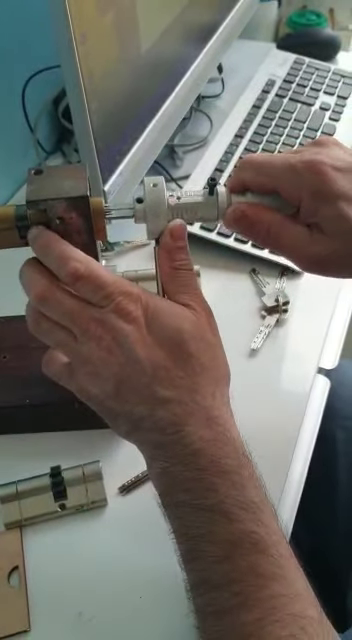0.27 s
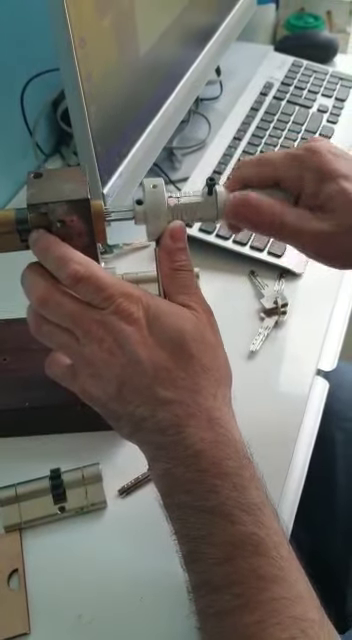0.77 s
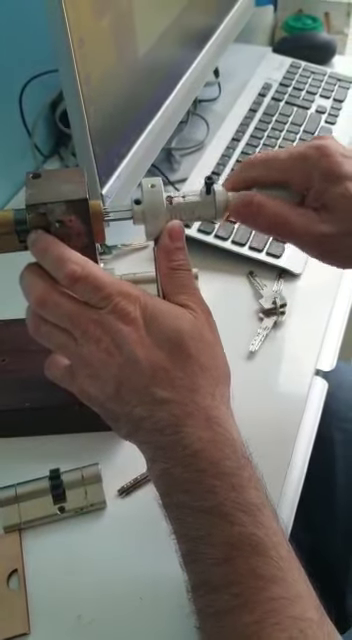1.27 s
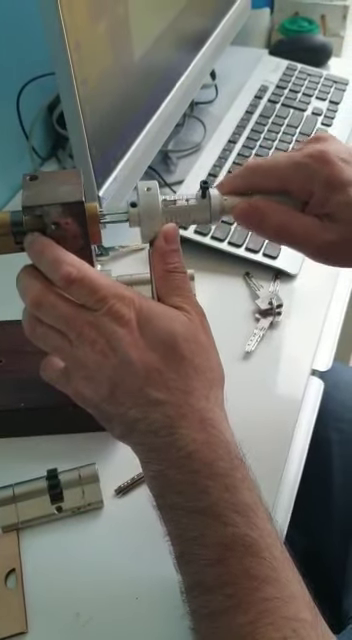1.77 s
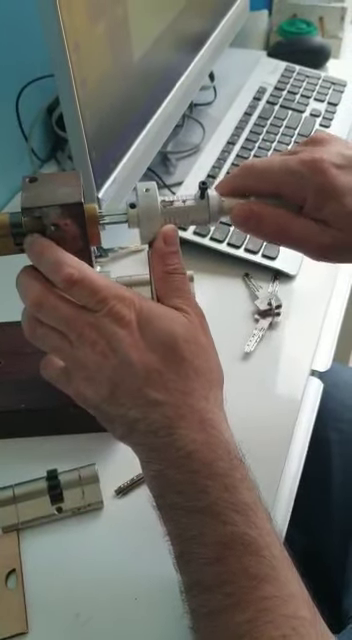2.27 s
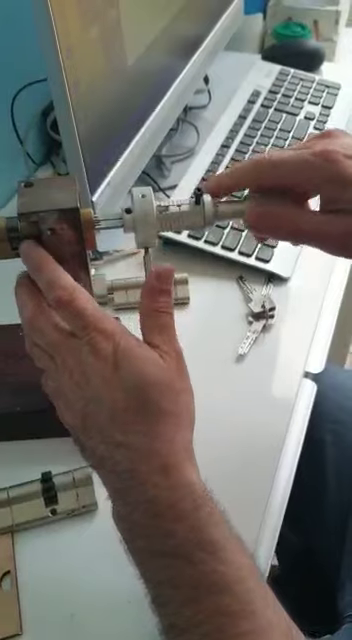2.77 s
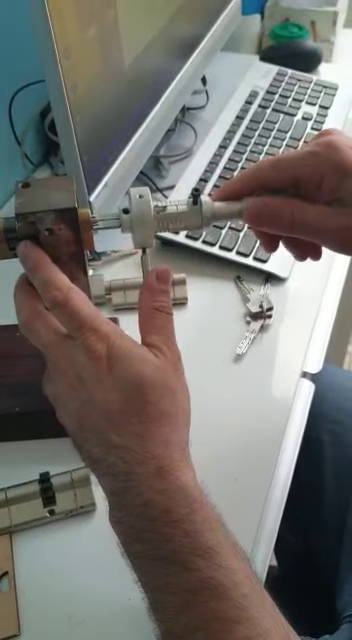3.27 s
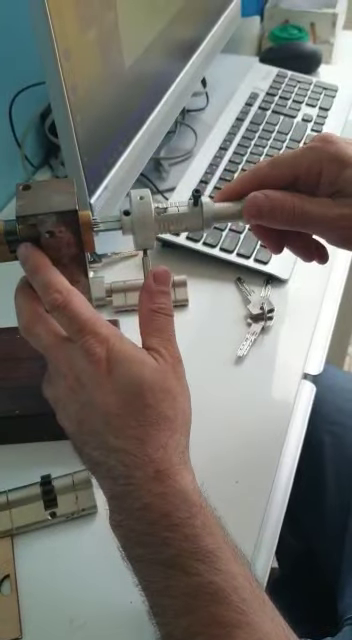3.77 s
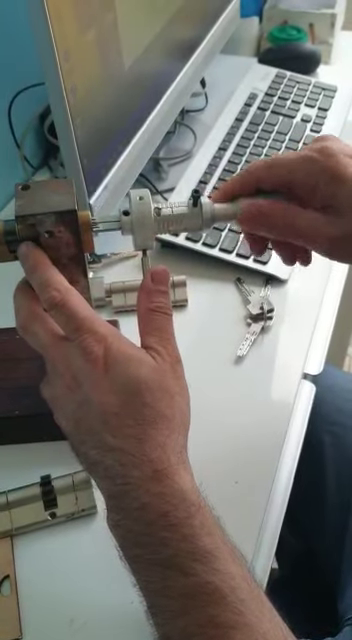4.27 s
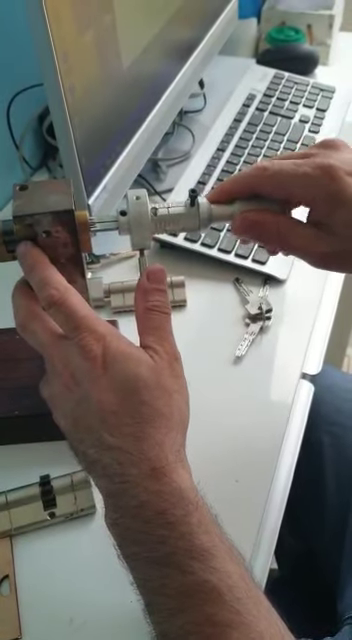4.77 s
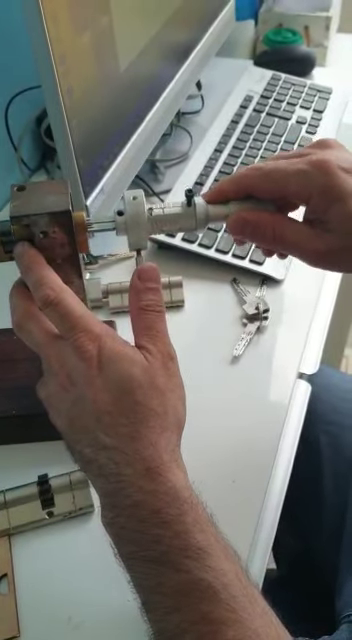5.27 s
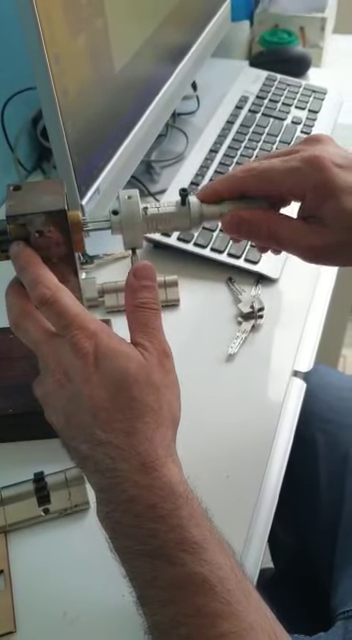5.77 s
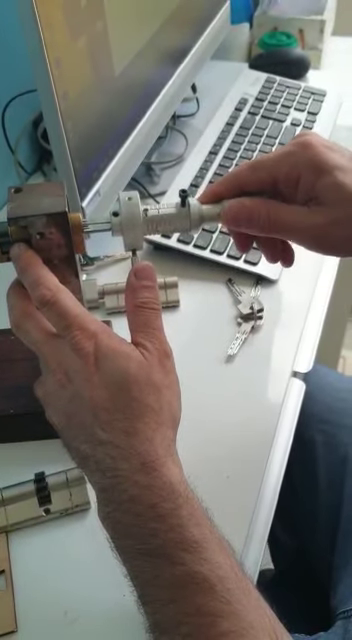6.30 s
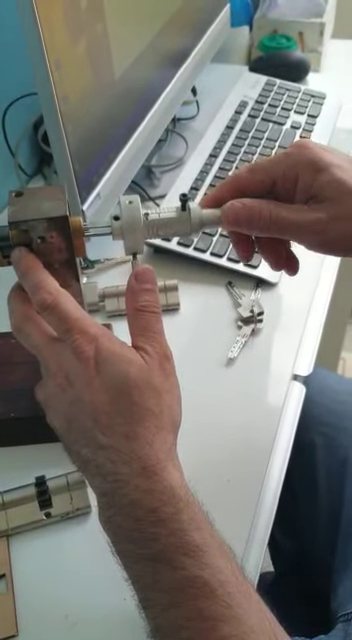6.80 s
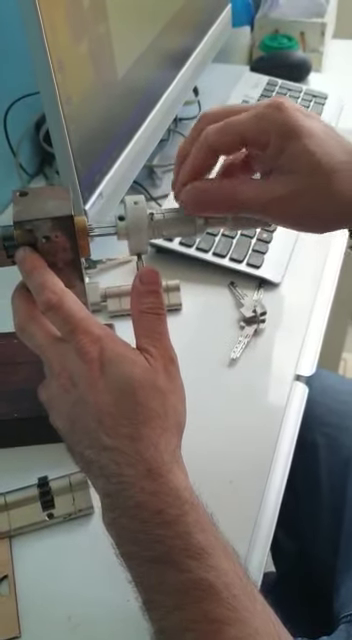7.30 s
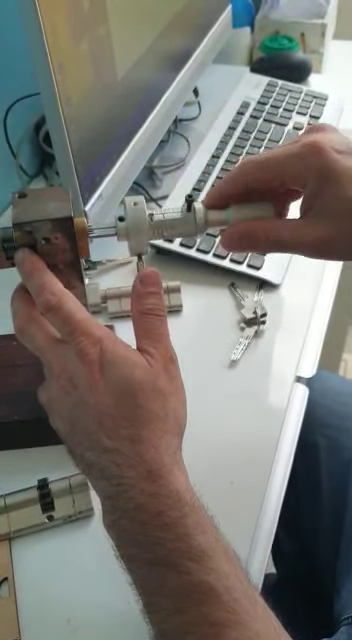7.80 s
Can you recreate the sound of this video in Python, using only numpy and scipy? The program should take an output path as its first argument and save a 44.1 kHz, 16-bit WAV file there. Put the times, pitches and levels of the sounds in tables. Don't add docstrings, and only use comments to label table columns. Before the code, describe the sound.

In a small room, a steel pick tool works in a lock cylinder close to a stereo microphone. Sparse dry ticks come first, then a snap and a high clean chirp, later a cluster of rough thread squeals, ticks and soft chirps, and a final small rattle. Underneath, a fan hums steadily with soft air, and far traffic rumbles with engines pulling away outside.

```python
import sys
import numpy as np
from scipy import signal
from scipy.fft import rfft, irfft, next_fast_len
from scipy.io import wavfile

SR = 44100
rng = np.random.default_rng(int(sys.argv[2]) if len(sys.argv) > 2 else 0)


def makeup_ratio(level_db):
    decades = np.asarray(level_db, float) / 20
    return 10 ** decades


def to_wav(s):
    ch = np.atleast_2d(s).T
    pcm = np.round(np.clip(ch, -1, 1) * 32767)
    wavfile.write(sys.argv[1], SR, pcm.astype(np.int16))


N = 354696

# pitch in Hz, level in dB.
FAN_TONES = [(64, -51), (100, -56.5), (124, -55), (153, -54), (241, -67), (304, -69.5), (366, -76),
             (376, -74), (425, -68), (485, -72.5), (545, -75), (596, -76.5)]
# time in seconds, level in dB.
DRONE_LEVEL = [(0, -53), (0.69, -59), (1.14, -49), (1.749, -47), (2.57, -62), (3.522, -46), (4.199, -45),
               (4.949, -65), (5.549, -49), (5.9, -55.5), (6.96, -45), (7.2, -51.5), (8.04, -47)]
DRONE_HZ = 182.2
# frequency in Hz, level in dB per Hz.
AIR_COLOUR = [(110, -23.5), (190, -5), (209, -14), (240, -9.5), (306, -11.5), (330, -14.5), (367, -6.5),
              (399, -13.5), (426, -12.5), (700, -18), (1100, -41.5), (2000, -74.5)]
AIR_DB, AIR_RISE_DB, AIR_RISE_S = -60, 11, 15

# time in seconds, level in dB.
TRAFFIC_LEVEL = [
    (0, -42.5),
    (1.14, -40.5),
    (2.6, -43),
    (3.4, -40),
    (4.8, -42),
    (5.4, -37.5),
    (6.7, -41.5),
    (7.4, -35),
    (8.04, -42.5),
]
# frequency in Hz, level in dB per Hz.
RUMBLE_COLOUR = [(13, -45.5), (22, -16), (32, -19.5), (50, -7.5), (70, -3.5), (134, -0.5), (155, 0),
                 (189, -14.5), (211, -29), (260, -21.5), (340, -56.5), (570, -120)]
# time in seconds, level in dB.
ROAD_LEVEL = [
    (0, -67.5),
    (1.0, -64.5),
    (2.6, -63),
    (4.8, -62),
    (5.3, -64.5),
    (6.6, -64),
    (7.2, -61.5),
    (8.04, -63.5),
]
# frequency in Hz, level in dB per Hz.
ROAD_COLOUR = [(500, -16), (740, -7), (900, 1.5), (1040, -4), (1200, -0.5), (1720, -9.5), (2050, -19),
               (3120, -25.5), (5280, -100)]
# frequency in Hz, likeness from 0 to 1.
LIKENESS = [(30, .85), (60, .88), (150, .95), (280, .68), (500, .3), (950, .05), (15000, 0)]
# frequency in Hz, left minus right in dB.
TILT = [(60, -19), (110, 3), (200, 1.5), (380, 0), (700, 4.5), (1290, -1.5), (2380, -2), (4400, 8.5),
        (8120, 12.5), (15000, 1)]

# start in seconds, peak, knock, body and crack levels in dB.
SPRING_TICKS = [
    (0.17, -63.5, -5, -18, -33),
    (0.1825, -60, -6, -24, -35),
    (0.2244, -44, -8.5, -22, -31),
    (0.232, -58, -25, 3, -12),
    (4.3808, -41.5, -26, -18, -17.5),
    (4.391, -74, -6, -3, -24),
    (4.402, -42, -26, -6.5, -38),
]
# start in seconds, peak, knock, body and crack levels in dB.
PIN_TICKS = [
    (0.549, -72, 7, -16, -20),
    (0.711, -80, 10, 0, -15),
    (1.0023, -74.5, -25, -27, -7),
    (6.1195, -70, -2, -18, -25),
    (6.4602, -48.5, -9.5, -16, -17),
    (6.471, -51, -4, -2.5, -16),
]
# start in seconds, peak and crack levels in dB.
LIGHT_TICKS = [
    (1.3765, -89, 25),
    (1.675, -74, -8),
    (1.727, -76, 14),
    (3.895, -72, -30),
    (7.2495, -86, 8),
]
# start in seconds, peak, knock, body and crack levels in dB.
SNAP_TICKS = [
    (1.447, -42, -13.5, -11, -10.5),
    (2.595, -50, -6.5, -32, -8),
    (2.606, -46, -9, -16, -10),
    (3.4025, -68, -32, -20, 3),
]
# start in seconds, peak, knock, body and crack levels in dB.
COLLAR_TICKS = [
    (2.866, -47.5, -4, -15, -28),
    (3.9612, -66, -9, -28.5, -2.5),
    (4.0484, -45.5, -20.5, -13, -23.5),
    (6.9829, -58, -4, -15, -29),
    (6.9924, -60, 0, -3, -22),
    (7.005, -46, -13, -35, -40),
    (7.012, -58.5, -15, -6, -17),
    (7.028, -71, 15, -29, 2),
]
# pitch in Hz, level in dB, seconds to fall 60 dB.
DESK_MODES = [(720, -12, .02), (960, -7, .025), (1170, 0, .05)]
# pitch in Hz, level in dB, seconds to fall 60 dB.
BODY_MODES = [(2500, 0, .022), (2850, -9, .01), (3700, -10, .01)]
PIN_HZ, COLLAR_HZ, SPRING_HZ, SNAP_HZ = 5990, 8150, 5300, 7100
PIN_DB, COLLAR_DB, SPRING_DB, SNAP_DB = -18, -17, -25.5, -32.5
PART_T60_S, RATTLE_S = .012, .024
CLICK_BAND_HZ = [4300, 8550]

# start and length in seconds, slip rate in Hz,
# level in dB, partials above the second in dB.
BREAKAWAY = [
    (1.4455, .022, 2060, -43, 4),
]
# start and length in seconds, slip rate in Hz,
# level in dB, partials above the second in dB.
CLEAN_SQUEALS = [
    (1.703, 0.051, 3928, -34, 1.5),
    (6.032, 0.029, 3890, -51, -17),
    (6.084, 0.018, 3860, -65, -20),
    (6.1155, 0.037, 3770, -43, -9),
    (6.263, 0.016, 3920, -63, -13),
    (6.343, 0.025, 3780, -59, -15),
]
# start and length in seconds, slip rate in Hz,
# level in dB, partials above the second in dB.
HARSH_SQUEALS = [
    (4.036, 0.034, 2736, -56.5, 16.7),
]
# start and length in seconds, slip rate in Hz,
# level in dB, partials above the second in dB.
ROUGH_SQUEALS = [
    (4.357, 0.037, 2540, -54, 4),
]
# share of the length to grip, share to let go, start below pitch in %,
# settling in seconds, jitter at the start in %, settled jitter in %, grit in dB.
BREAKAWAY_SLIP = (.25, .55, 24, .003, 2.5, 1.0, -8)
CLEAN_SLIP = (.22, .45, 1.3, .018, .3, .25, -38)
HARSH_SLIP = (.15, .5, 0, .006, 4, 2.2, -10)
ROUGH_SLIP = (.45, .35, 2.5, .008, 2.5, 1.6, -21)
# frequency in Hz, level in dB.
CLEAN_COLOUR = [(3800, 0.5), (7600, -0.5), (7830, -1), (11500, -11), (15500, -9.5)]
ROUGH_COLOUR = [(2000, -8.5), (3000, -2), (5600, 3), (8200, 1.5), (8900, -19.5), (9800, -5), (11200, -9.5),
                (15000, -18)]
# time in seconds, slip rate in Hz, level in dB.
TURNS = [
    [(3.111, 2900, -66), (3.117, 2705, -57.5), (3.124, 2740, -54), (3.132, 3140, -54), (3.138, 2880, -59),
     (3.144, 3034, -51.5), (3.16, 2950, -56.5), (3.178, 2900, -62)],
    [(3.238, 2984, -73), (3.244, 3107, -58.5), (3.256, 3280, -58), (3.266, 3286, -55), (3.276, 3030, -52.5),
     (3.28, 3080, -55), (3.285, 3040, -55)],
    [(3.371, 2785, -76), (3.381, 2660, -62), (3.395, 2633, -57), (3.409, 2880, -61), (3.414, 2893, -71)],
    [(4.265, 2630, -62), (4.275, 3015, -54.5), (4.285, 3132, -62), (4.291, 3130, -50), (4.301, 3072, -49.5),
     (4.339, 2976, -52.5), (4.358, 2958, -58)],
]
# second partial in dB, higher partials in dB, jitter in %, grit in dB.
TURN_TONE = [
    (-1, 6.5, 2.7, -13),
    (-5, -8, 2, -28),
    (3, 2.5, 0.56, -29),
    (2.5, 5, 2, -9),
]
# pitch in Hz, level in dB, seconds to fall 60 dB.
SHANK_MODES = [(8230, -9, 0.045), (12400, -16.5, 0.016), (15000, -10.5, 0.032)]
GRIP_DB, LET_GO_DB = -18.5, -32.5
TURN_GRIP_S, TURN_LET_GO_S, TURN_DB = 0.0021, 0.0039, 7
JITTER_HZ, FLUTTER_HZ, FLUTTER_DB = 280, 60, 2.0
SLIP_SIZE = 4500

# time in seconds, firing rate in Hz, load in dB.
GEARS = [
    [(2.5, 34.04, -56), (2.95, 35.2, -47.5), (3.07, 39.44, -43), (3.55, 39.2, -44.5), (3.72, 44.5, -38.5),
     (3.82, 44.53, -47)],
    [(3.8, 44.8, -39.5), (4.25, 48.6, -49.5), (4.55, 54.8, -46), (4.75, 58.85, -40.5), (5.1, 63.5, -39.5),
     (5.5, 71.7, -43.5), (5.9, 75.4, -51)],
    [(3.75, 45.7, -53.5), (4.9, 49.64, -56), (5.9, 54.62, -55.5), (6.4, 60.03, -46.5), (6.55, 61.9, -38),
     (7.0, 62.54, -42.5), (7.25, 61.74, -45), (7.63, 61.33, -43.5), (8.04, 59.9, -45.5)],
]
# 1st, 2nd and 3rd order in dB.
ORDERS_DB = [
    (-5, -4, 2),
    (-0.5, -15.5, -32),
    (-5, 0.5, -19.5),
]

# time in seconds, level in dB.
SLIDE_LEVEL = [
    (3.52, -77),
    (3.558, -56.5),
    (3.602, -58.5),
    (3.7, -72),
    (3.77, -87),
    (3.86, -96),
]
# frequency in Hz, level in dB per Hz.
SLIDE_COLOUR = [(880, -32), (1500, -2.5), (2970, -12.5), (3470, -17.5), (3970, -11), (6810, -15.5),
                (8330, -26), (9720, -19.5), (15000, -32)]

# frequency in Hz, seconds to fall 60 dB.
ROOM_T60 = [(500, .3), (3000, .29), (4000, .3), (5500, .22), (9000, .23), (15000, .2)]
# frequency in Hz, level in dB.
ROOM_COLOUR = [(600, -12), (1300, -5), (2300, 1), (4000, -4), (8000, -1), (15000, -0.5)]
# frequency in Hz, right below left in dB.
SHADOW = [(500, -2), (2500, -2), (3300, 2), (3900, -5), (4700, 9), (5500, 19), (8200, 21), (11000, 9),
          (15000, 14)]
ROOM_DB, ROOM_GAP_S, ROOM_SHADOW_SHARE = -7, 0.01, 0.7
RIGHT_LAG_S = 1 / SR
PORT_DIP_HZ, PORT_DIP_WIDTH_HZ, PORT_DIP_SHARE = 9400, 1800, .6
# frequency in Hz, level in dB per Hz.
HISS_COLOUR = [(1470, -29), (2500, 1), (3110, -6), (3900, -1), (5460, -8), (7650, -12), (8330, -16),
               (10800, -7), (14500, -3), (15300, -5), (16200, -15)]
HISS_DB, CUTOFF_HZ = -82, 16420


def rms_one(x):
    return x / np.sqrt(np.mean(x ** 2) + 1e-20)


def in_time(rows, t):
    s, *columns = np.transpose(rows)
    return [np.interp(t, s, c) for c in columns]


def at_hz(points, hz):
    points = np.array(points)
    return np.interp(np.log(np.maximum(hz, 1)), np.log(points[:, 0]), points[:, 1])


def drift(rate_hz, size):
    r = np.exp(-2 * np.pi * rate_hz / SR)
    run_in = int(SR / rate_hz)
    white = rng.standard_normal(size + run_in)
    return rms_one(signal.lfilter([1], [1, -2 * r, r * r], white)[run_in:])


def ring(force, modes):
    out = 0
    for hz, level_db, t60 in modes:
        r, w = makeup_ratio(-60 / (t60 * SR)), 2 * np.pi * hz / SR
        out = out + makeup_ratio(level_db) * signal.lfilter([0, np.sin(w)], [1, -2 * r * np.cos(w), r * r], force)
    return out


def noise(colour):
    size = next_fast_len(N)
    hz = np.fft.rfftfreq(size, 1 / SR)
    mid, side = rfft(rng.standard_normal((2, size)))
    alike = np.clip(at_hz(LIKENESS, hz), 0, .99)
    inside = (hz > colour[0][0]) & (hz < colour[-1][0])
    gain = makeup_ratio(at_hz(colour, hz) + np.outer([.5, -.5], at_hz(TILT, hz))) * inside
    both = np.sqrt(1 + alike) * mid + np.sqrt(1 - alike) * side * np.array([[1], [-1]])
    out = irfft(gain * both, size)[:, :N]
    return out / np.std(out.mean(axis=0))


def fan():
    t, step = np.arange(N) / SR, 200

    def slow(rate_hz):
        return drift(rate_hz * step, size=N // step + 1)

    def spread(values):
        return np.interp(t, np.arange(len(values)) * step / SR, values)

    tones = 0
    for hz, level_db in FAN_TONES:
        strength = spread(makeup_ratio(level_db + 3.0 * slow(1.2)))
        tones = tones + strength * np.sin(2 * np.pi * hz * t + spread(1.2 * slow(.8)))
    drone_level = makeup_ratio(in_time(DRONE_LEVEL, t)[0] - 2.5)
    drone = drone_level * np.sin(2 * np.pi * DRONE_HZ * t + spread(0.57 * slow(0.65)))
    return np.sqrt(2) * (tones + drone)


def air_flow():
    t = np.arange(N) / SR
    return makeup_ratio(AIR_DB + AIR_RISE_DB * (1 - np.exp(-t / AIR_RISE_S))) * noise(AIR_COLOUR)


def far_traffic():
    return makeup_ratio(in_time(TRAFFIC_LEVEL, np.arange(N) / SR)[0] - 4.0) * noise(RUMBLE_COLOUR)


def tyre_roar():
    level_db, = in_time(ROAD_LEVEL, np.arange(N) / SR)
    return makeup_ratio(level_db + 1.34 * drift(6, size=N)) * noise(ROAD_COLOUR)


def ticks():
    t = np.arange(2500) / SR
    out = np.zeros(N + len(t))
    crack = signal.butter(2, 11000, "high", fs=SR, output="sos")
    click = signal.butter(2, CLICK_BAND_HZ, "band", fs=SR, output="sos")
    light = [(s, db, -40, -40, crack_db) for s, db, crack_db in LIGHT_TICKS]
    struck = ((SPRING_TICKS, SPRING_HZ, SPRING_DB), (PIN_TICKS, PIN_HZ, PIN_DB),
              (SNAP_TICKS, SNAP_HZ, SNAP_DB), (COLLAR_TICKS + light, COLLAR_HZ, COLLAR_DB))
    for rows, part_hz, part_db in struck:
        for s, peak_db, knock_db, body_db, crack_db in rows:
            force = rng.standard_normal((4, len(t))) * makeup_ratio(-40 * t / RATTLE_S)
            force[0] = t == 0
            part = ring(force[2], [(part_hz, part_db, PART_T60_S)]) + signal.sosfilt(click, force[2])
            tick = rms_one(ring(force[0], DESK_MODES)) * makeup_ratio(knock_db + 4.0)
            tick += rms_one(ring(force[1], BODY_MODES)) * makeup_ratio(body_db)
            tick += rms_one(part)
            tick += rms_one(signal.sosfilt(crack, force[3])) * makeup_ratio(crack_db + 19.5)
            start = round(s * SR)
            out[start:start + len(t)] += makeup_ratio(peak_db - 9.5) * tick
    return out[:N]


def slips(slip_hz, level_db, colour, jitter, second_db, upper_db):
    size = len(level_db)
    unsteady_hz = slip_hz * (1 + jitter * drift(JITTER_HZ, size=SLIP_SIZE)[:size] / 100)
    phase = 2 * np.pi * np.cumsum(unsteady_hz) / SR
    flutter_depth_db = FLUTTER_DB * min(1, 3 * np.min(jitter))
    out = 0
    for k in range(1, int(16000 / np.max(slip_hz)) + 1):
        partial_db = level_db + at_hz(colour, k * slip_hz) + second_db * (k == 2) + upper_db * (k > 2)
        partial_db = partial_db + flutter_depth_db * drift(FLUTTER_HZ, size=SLIP_SIZE)[:size]
        out = out + np.sqrt(2) * makeup_ratio(partial_db) * np.sin(k * phase)
    return out


def grip_and_let_go(gripped, left):
    return GRIP_DB * np.clip(1 - gripped, 0, 1) ** 2 + LET_GO_DB * np.clip(1 - left, 0, 1) ** 2


def scrape(level_db):
    return makeup_ratio(level_db) * np.diff(rng.standard_normal(SLIP_SIZE + 1))[:len(level_db)]


def short_squeals():
    out, grit = np.zeros((2, N))
    threads = ((BREAKAWAY, ROUGH_COLOUR, BREAKAWAY_SLIP), (CLEAN_SQUEALS, CLEAN_COLOUR, CLEAN_SLIP),
               (HARSH_SQUEALS, ROUGH_COLOUR, HARSH_SLIP), (ROUGH_SQUEALS, ROUGH_COLOUR, ROUGH_SLIP))
    for rows, colour, slip in threads:
        grip, let_go, below, settle_s, wild, calm, grit_db = slip
        for s, length, slip_hz, peak_db, upper_db in rows:
            at = np.arange(round(s * SR), round((s + length) * SR))
            t = at / SR - s
            unsettled = np.exp(-t / settle_s)
            level_db = peak_db + grip_and_let_go(t / length / grip, (1 - t / length) / let_go)
            climbing_hz = slip_hz * (1 - below * unsettled / 100)
            jitter = calm + (wild - calm) * unsettled
            grit[at] += scrape(level_db + grit_db)
            out[at] += slips(climbing_hz, level_db, colour, jitter, 0, upper_db)
    return out, grit


def engine():
    out, t = np.zeros(N), np.arange(N) / SR
    for rows, order_db in zip(GEARS, ORDERS_DB):
        hz, load_db = in_time(rows, t)
        phase = 2 * np.pi * np.cumsum(hz) / SR
        fade = np.clip(np.minimum(t - rows[0][0], rows[-1][0] + 0.091 - t) / 0.13, 0, 1)
        for order, db in enumerate(order_db, 1):
            out += np.sqrt(2) * fade * makeup_ratio(load_db + db) * np.sin(order * phase)
    return out * makeup_ratio(np.array([[-1.3], [1.3]]))


def long_turns():
    out, grit = np.zeros((2, N))
    for rows, (second_db, upper_db, jitter, grit_db) in zip(TURNS, TURN_TONE):
        start, end = rows[0][0], rows[-1][0]
        at = np.arange(round(start * SR), round(end * SR))
        t = at / SR
        slip_hz, level_db = in_time(rows, t)
        level_db += TURN_DB + grip_and_let_go((t - start) / TURN_GRIP_S, (end - t) / TURN_LET_GO_S)
        grit[at] += scrape(level_db + grit_db)
        out[at] += slips(slip_hz, level_db, ROUGH_COLOUR, jitter, second_db, upper_db)
    return out, grit


def squeals():
    squeal, grit = np.add(short_squeals(), long_turns())
    grit += 1e-18
    return squeal + grit + ring(makeup_ratio(-8.0) * grit + makeup_ratio(-36.0) * squeal, SHANK_MODES)


def slide():
    t = np.arange(N) / SR
    level_db, = in_time(SLIDE_LEVEL, t)
    touching = (t > SLIDE_LEVEL[0][0]) & (t < SLIDE_LEVEL[-1][0])
    return noise(SLIDE_COLOUR) * makeup_ratio(level_db + 0.78 * drift(51.4, size=N)) * touching


def room_tail(reflections):
    t = np.arange(SR // 2) / SR
    hz, white, tail = np.fft.rfftfreq(len(t), 1 / SR), rfft(reflections), 0
    edges = np.geomspace(400, 17000, 9)
    for low, high in zip(edges, edges[1:]):
        middle = np.sqrt(low * high)
        band = irfft(white * ((hz >= low) & (hz < high)), len(t))
        tail = tail + band * makeup_ratio(at_hz(ROOM_COLOUR, middle) - 60 * t / at_hz(ROOM_T60, middle))
    tail = tail * np.clip(t / ROOM_GAP_S - 1, 0, 1)
    return makeup_ratio(ROOM_DB) * tail / np.sqrt(np.sum(tail ** 2) / 2)


def to_microphones(x, reflections):
    size = next_fast_len(N + SR // 2)
    hz = np.fft.rfftfreq(size, 1 / SR)
    shadow_db = np.outer([0, -1], at_hz(SHADOW, hz))
    direct = makeup_ratio(shadow_db) * np.exp(-2j * np.pi * np.outer([0, RIGHT_LAG_S], hz))
    echoes = makeup_ratio(ROOM_SHADOW_SHARE * shadow_db) * rfft(room_tail(reflections), size)
    ports = 1 - PORT_DIP_SHARE * np.exp(-(2 * (hz - PORT_DIP_HZ) / PORT_DIP_WIDTH_HZ) ** 2)
    return irfft(rfft(x, size) * ports * (direct + echoes), size)[:, :N]


def scene():
    background = fan() + air_flow() + far_traffic() + tyre_roar() + engine()
    reflections = rng.standard_normal((2, SR // 2))
    return background + slide() + to_microphones(ticks() + squeals(), reflections)


def roll_off(x):
    return signal.sosfilt(signal.butter(12, 16640, fs=SR, output="sos"), x)


def record(dry):
    heard = dry + makeup_ratio(HISS_DB) * noise(HISS_COLOUR)
    low_pass = signal.cheby2(14, 60, CUTOFF_HZ, fs=SR, output="sos")
    mix = signal.sosfilt(low_pass, heard)
    return roll_off(mix)


dry = scene()
out = record(dry)
to_wav(out)
```